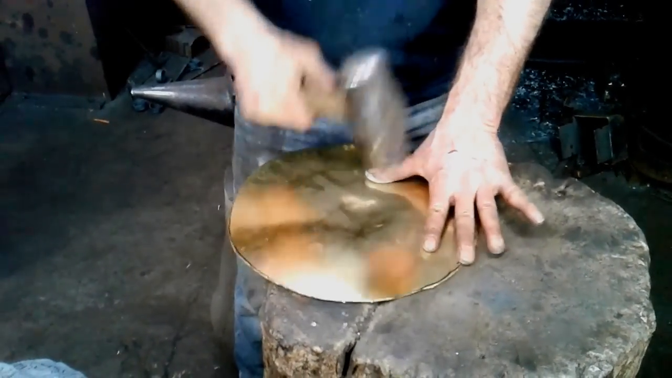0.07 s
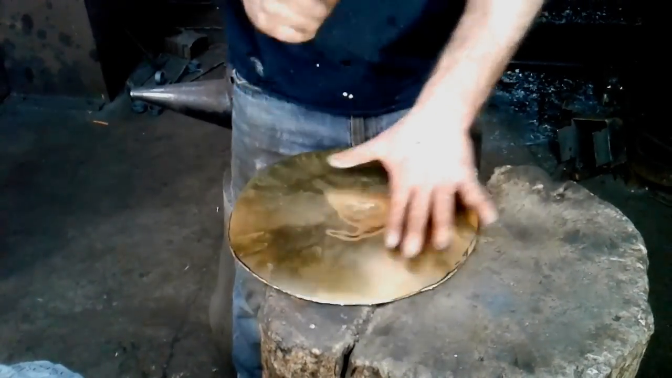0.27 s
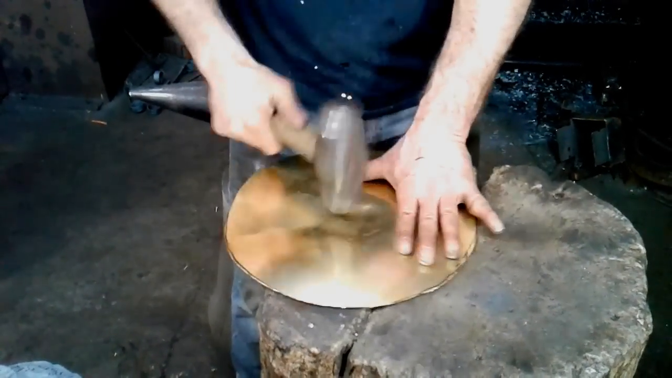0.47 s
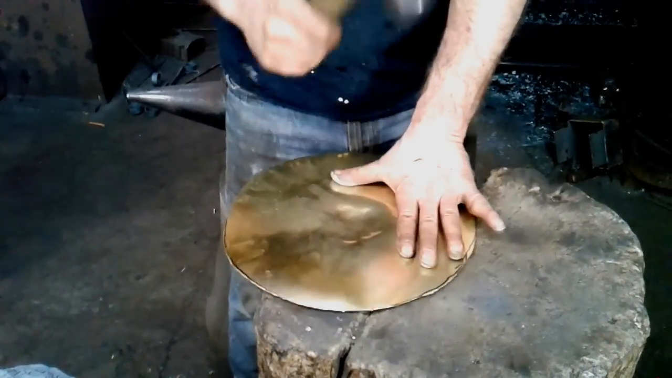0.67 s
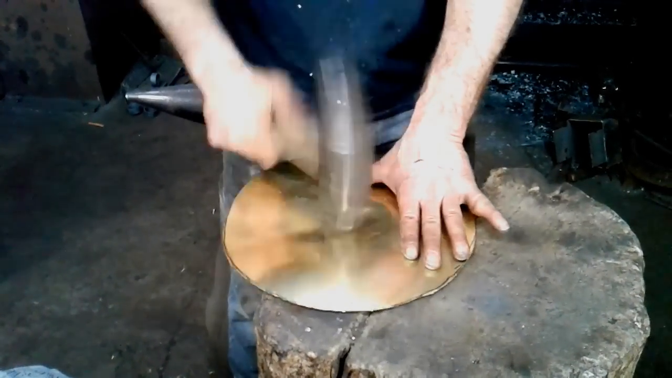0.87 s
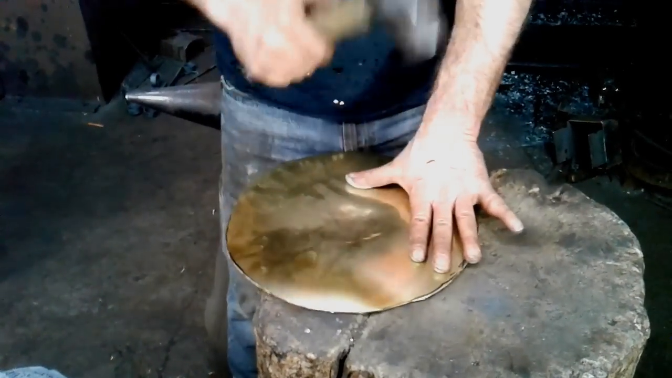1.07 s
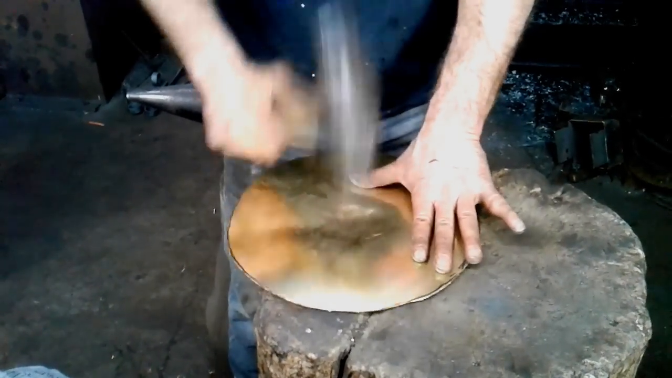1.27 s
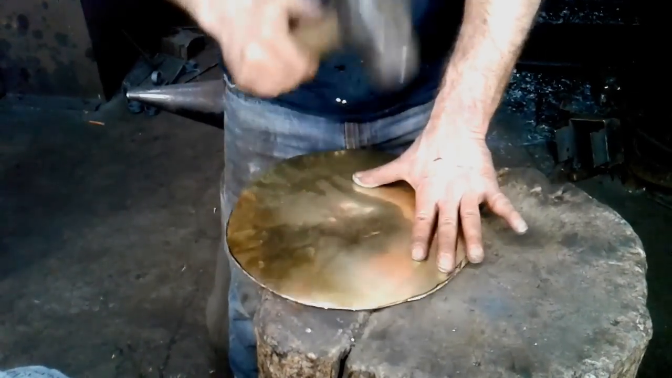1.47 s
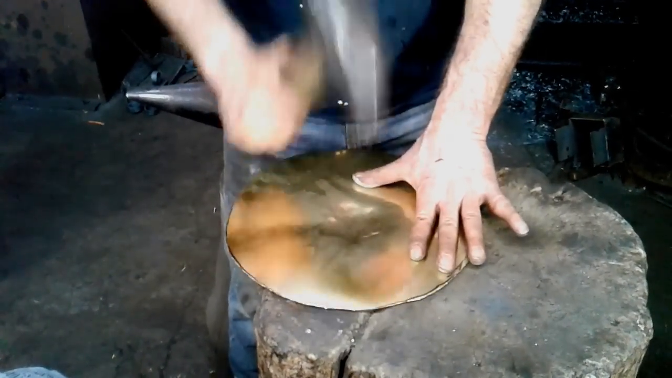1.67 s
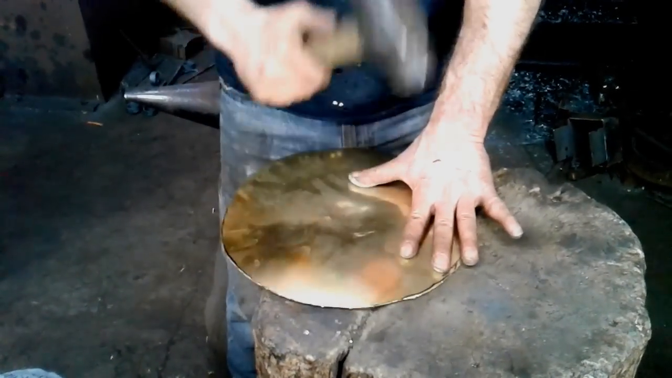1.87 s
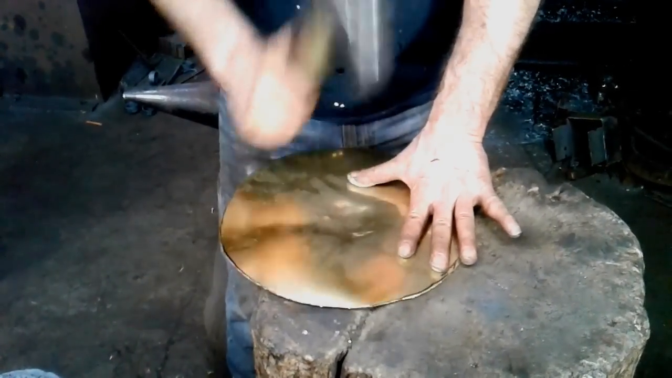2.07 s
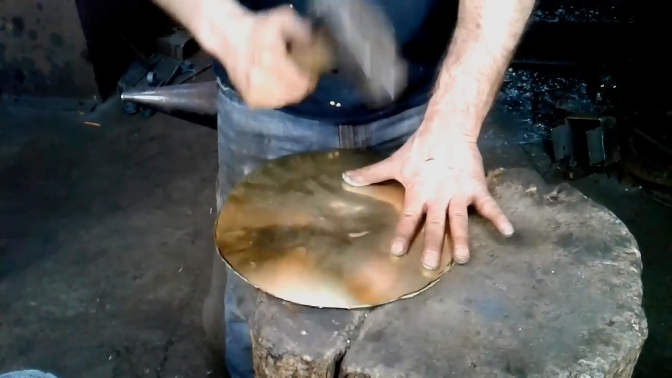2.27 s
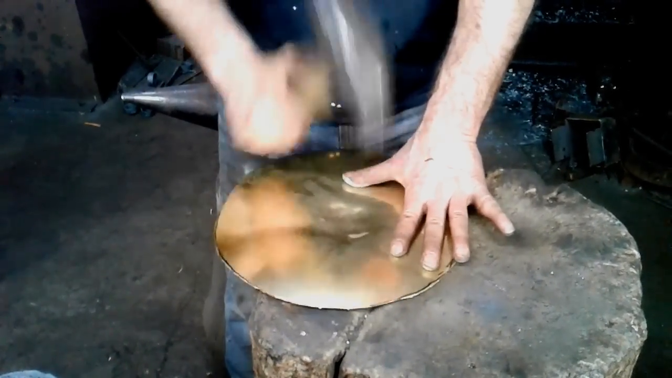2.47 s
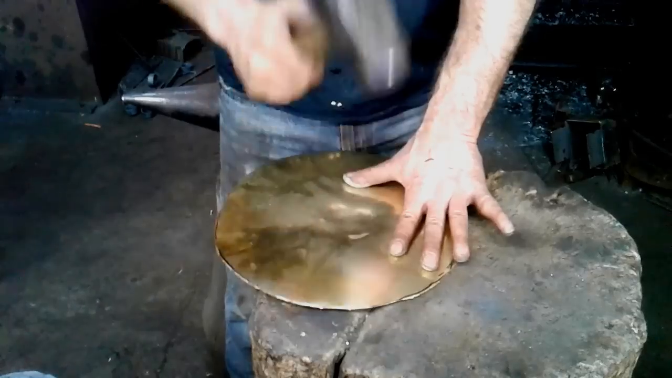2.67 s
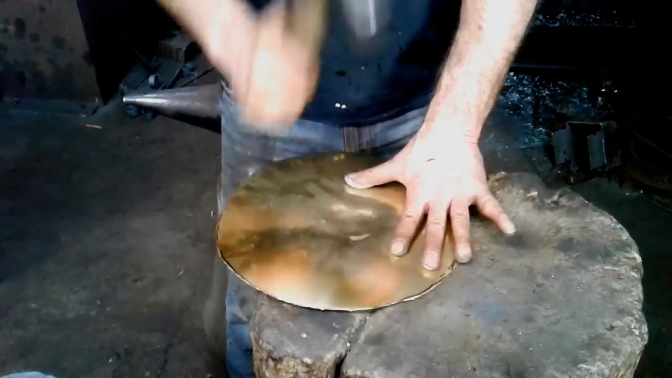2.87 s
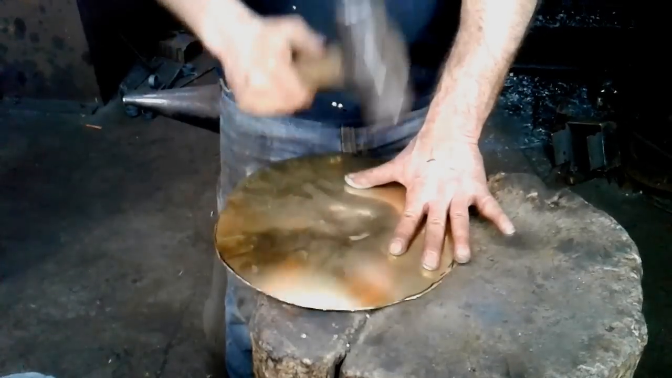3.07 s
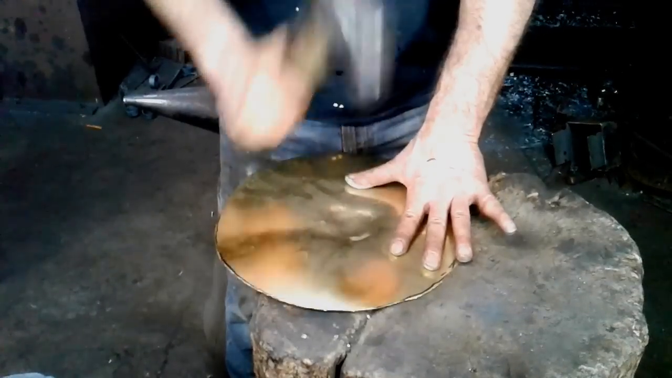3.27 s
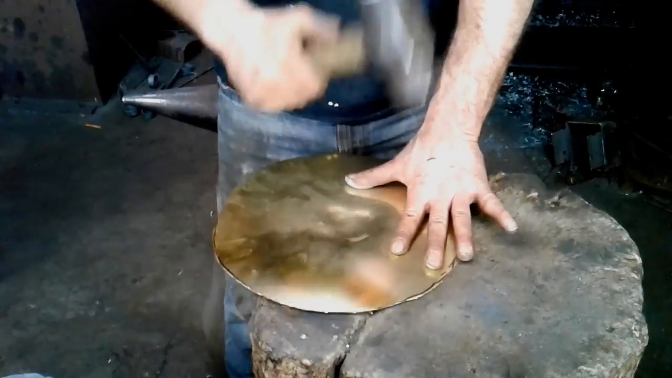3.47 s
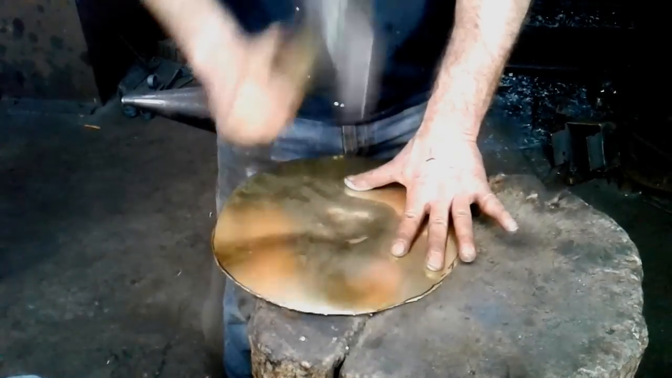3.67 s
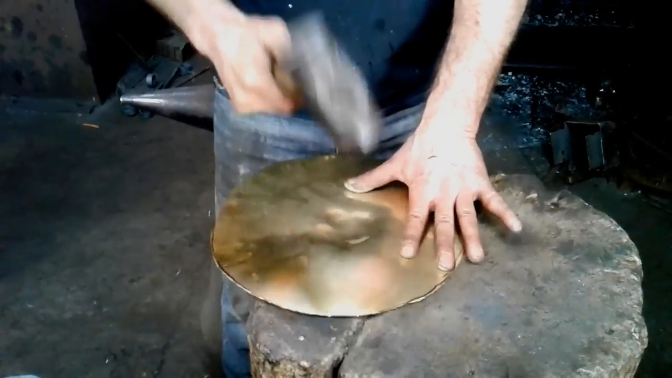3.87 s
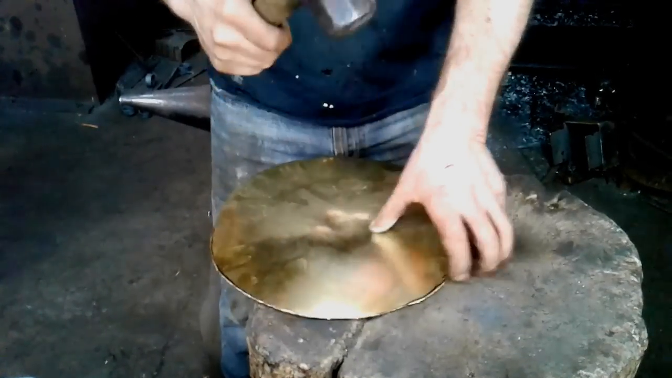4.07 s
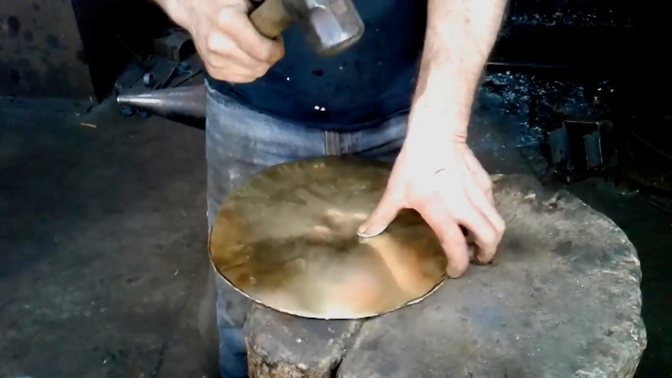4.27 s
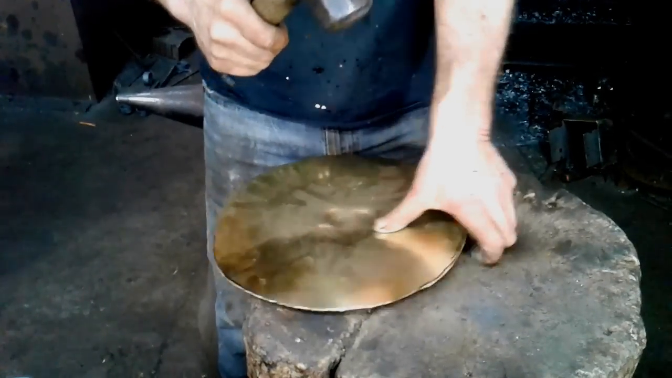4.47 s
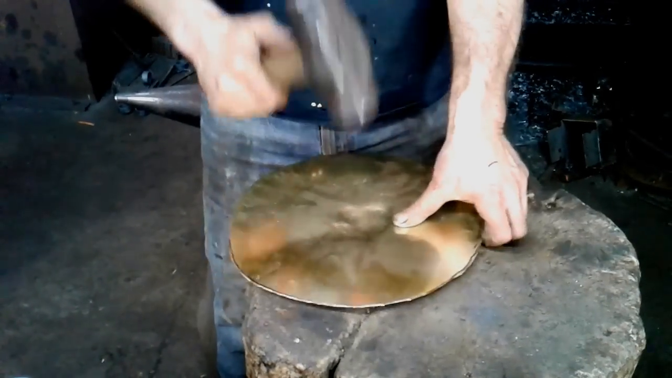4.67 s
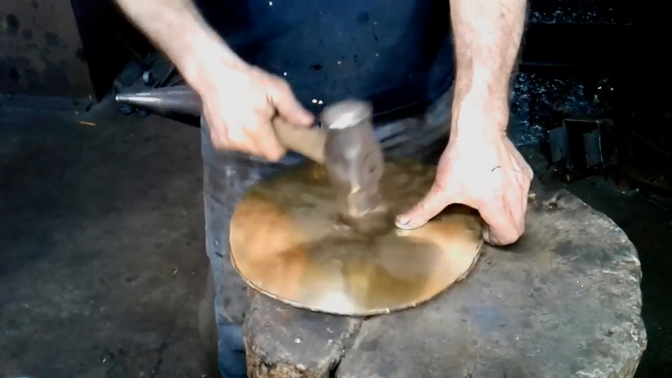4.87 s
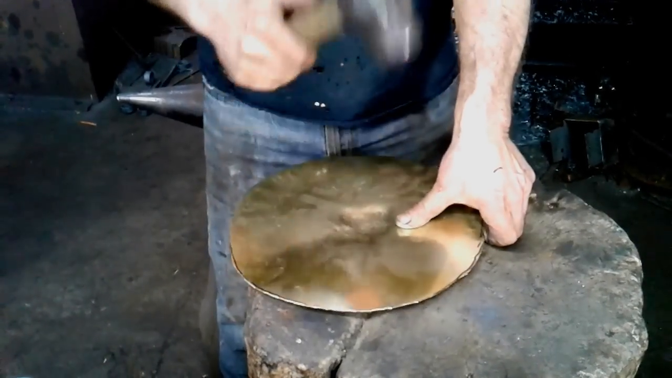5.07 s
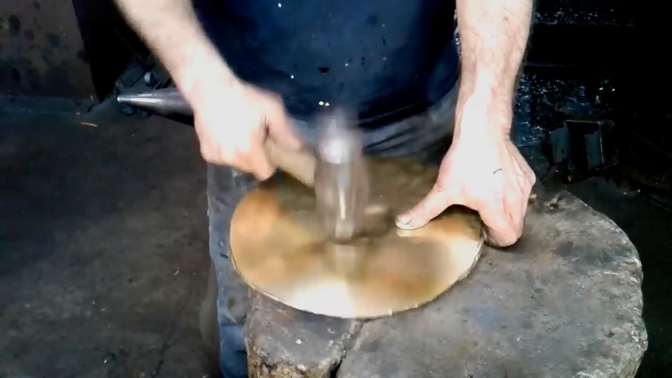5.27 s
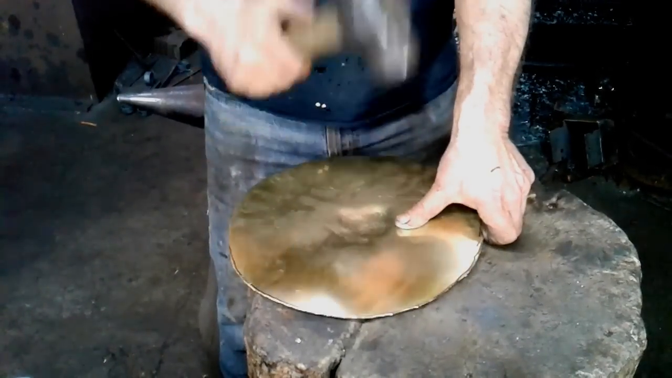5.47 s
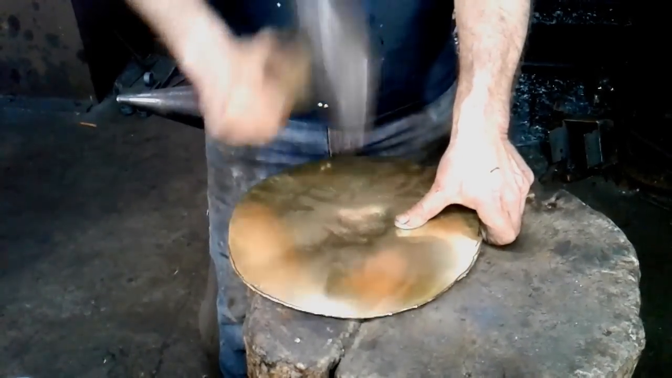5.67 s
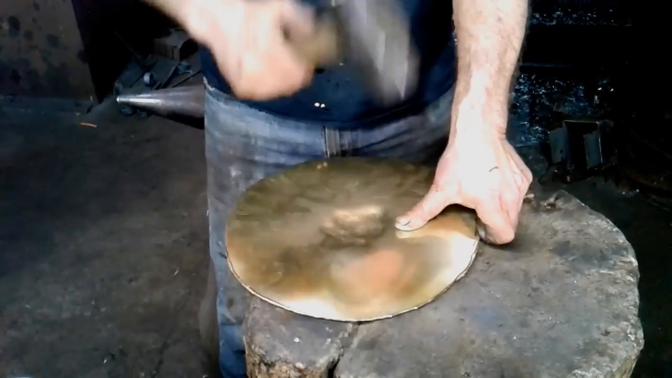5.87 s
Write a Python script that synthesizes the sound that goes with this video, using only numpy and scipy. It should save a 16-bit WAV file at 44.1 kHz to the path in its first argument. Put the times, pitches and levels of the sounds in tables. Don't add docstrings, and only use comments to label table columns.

```python
import sys
import numpy as np
from scipy import signal
from scipy.fft import rfft, irfft, next_fast_len
from scipy.io import wavfile

SR = 44100
rng = np.random.default_rng(int(sys.argv[2]) if len(sys.argv) > 2 else 0)


def wav_record(signal):
    frames = np.transpose(np.atleast_2d(signal))
    bounded = np.clip(frames, -1, 1)
    quanta = np.round(bounded * 32767).astype(np.int16)
    wavfile.write(sys.argv[1], SR, quanta)


def invert_db(x):
    u = np.asarray(x, float) / 20
    return 10 ** u


N = 260631
RUN_IN = SR // 2
LONG = N + RUN_IN

# [f/Hz, density/dB per Hz]
AIR_SPECTRUM = [(20, 1.5), (45, 0.5), (85, 0), (150, -3.5), (260, -2.5), (420, -8), (600, -11), (1000, -13),
                (2500, -20.5), (4600, -25), (6500, -16), (8000, -26.5), (9500, -30), (11500, -71),
                (16000, -68)]
# [f/Hz, level/dB, width/Hz]
MOTOR_LINES = [(119.3, 0, 22), (240, -15, 8), (290, -20, 15)]
# [t/s, level/dB, low clang/dB, bias kick 0-4]
BLOWS = [(0.1441, 3, -1.5, 2.1), (0.597, -5, 4, 0.51), (1.0149, -2.5, -1.5, 0.25), (1.424, 0.9, 1, 1.45),
         (1.844, 2, -7, 1.3), (2.253, 1.14, -3, 2.02), (2.6276, -2, -9, 0.17), (3.056, 4.5, -8, 2.5),
         (3.47, 2.16, 2, 1.63), (3.8645, -1.5, 14.5, 1.82), (4.9207, -11, 12, 0.37), (5.3909, 2.95, -32, 1),
         (5.8324, 3.5, -33, 0.49)]
EARLIER_BLOW = (-0.23, 0.7, 0.93, 1.1)
# [t/s of the blow, f/Hz, gain/dB]
FREE_MODES = [(0.144, 833, -6.5), (0.597, 589, 12), (0.597, 686, 9), (0.597, 963, 17), (0.597, 988, 4),
              (0.597, 900, -3), (1.015, 624, -3.5), (1.015, 976, 3), (1.015, 3100, 4), (1.424, 1630, -14),
              (2.628, 1590, -1), (3.470, 1500, -7), (5.391, 1263, 8.5), (4.921, 930, 2), (5.391, 5570, 5)]
# [f/Hz, density/dB per Hz]
DISC_SPECTRUM = [(60, 2), (130, -7.5), (200, -3), (320, -2), (450, -6), (700, -3.5), (1000, -5), (2000, -5),
                 (4000, -3), (6600, 0.5), (8500, -9.5), (11000, -27.5), (16000, -36)]
# [f/Hz, gain/dB]
LOW_MODE_GAIN = [(700, -14.5), (1600, -0.65)]
# [f/Hz, T60/s]
ROOM_T60 = [(100, 0.21), (260, 0.58), (700, 0.74), (1840, 0.64), (4850, 0.37), (8000, 0.32), (11000, 0.33),
            (15000, 0.14)]
# [t/s, peak level/dB, f/Hz]
TICKS = [(4.1274, -40, 7000), (4.1623, -32, 7500), (4.1694, -43, 7500), (4.1894, -32, 6600),
         (4.2024, -33, 6800), (4.2104, -34, 7300), (4.354, -27, 6800), (4.3954, -46, 7000),
         (4.4004, -34, 7000), (4.4176, -29, 6900), (4.605, -33, 4200), (4.611, -33, 5200),
         (4.619, -42, 4600)]
# [t/s, level/dB]
SLAPS = [
    (4.9203, 8),
    (4.9485, -4),
    (4.9842, 5.5),
    (5.1836, -31),
]


def rms_one(x):
    return x / np.sqrt(np.mean(x ** 2) + 1e-20)


def at_hz(points, hz):
    table = np.array(points)
    return np.interp(np.log(hz), np.log(table[:, 0]), table[:, 1])


def colour(x, level_db):
    hz = np.maximum(np.arange(len(x) // 2 + 1) * SR / len(x), 10)
    return irfft(rfft(x) * invert_db(level_db(hz)), len(x))


def resonance(x, hz, width_hz):
    r = np.exp(-np.pi * width_hz / SR)
    gain = (1 - r * r) / 2
    return signal.lfilter([gain, 0, -gain], [1, -2 * r * np.cos(2 * np.pi * hz / SR), r * r], x)


def add(track, s, x):
    i = RUN_IN + round(s * SR)
    track[i:i + len(x)] += x[:len(track) - i]


def background():
    air_db, hum_db = -44.5, -41.5
    waver_depth, waver_rad = 0.22, 0.3
    white = rng.standard_normal(2 * next_fast_len(LONG // 2 + 1))
    air = colour(white, lambda hz: at_hz(AIR_SPECTRUM, hz))[:LONG]
    out = invert_db(air_db) * rms_one(air)
    t = np.arange(LONG) / SR
    for hz, level_db, width_hz in MOTOR_LINES:
        r = np.exp(-np.pi * width_hz / SR)
        waver = rms_one(signal.lfilter([1], [1, -2 * r, r * r], rng.standard_normal(LONG)))
        line = np.sin(2 * np.pi * hz * t + waver_rad * waver)
        out += invert_db(level_db + hum_db) * (1 + waver_depth * waver) * line
    return out


def dispersed_click(spread_s, count=SR // 6):
    hz = np.arange(count // 2 + 1) * SR / count
    knots = np.arange(0, SR / 2 + 150, 150)
    scatter = np.minimum(rng.exponential(size=len(knots)), 3) ** 1.5
    delay = np.interp(hz, knots, spread_s * scatter + 0.0003816)
    phase = 2 * np.pi * np.cumsum(delay) * SR / count
    click = irfft(np.exp(-1j * phase), count)
    click[count // 2:] = 0
    return click


def struck(hz, level, t60, phase, count):
    t = np.arange(count)[:, None] / SR
    decay = np.exp(-np.log(1000) * t / t60)
    return (decay * np.sin(2 * np.pi * (hz * t + phase))) @ level


def blow(level_db, stump_db, clang_db, bright_db, spread_s=0.006):
    drive_db, modes_db, ring_s = 33.5, -46, 0.068

    def spectrum(hz):
        landing = [(280, stump_db), (800, 0.15 * clang_db), (2000, 0.0042), (5500, bright_db)]
        return at_hz(DISC_SPECTRUM, hz) + at_hz(landing, hz)

    crash = colour(dispersed_click(spread_s), spectrum)
    crash[len(crash) // 2:] = 0
    place, size, life, phase = rng.random(size=(4, 60))
    hz = 300 + (np.arange(len(place)) + place) * 130
    t60 = ring_s * (hz / 2000) ** -0.15 * (0.85 + 0.34 * life)
    mode_db = spectrum(hz) + at_hz(LOW_MODE_GAIN, hz) - 11.5 * size
    modes = struck(hz, invert_db(mode_db), t60, phase, len(crash))
    return invert_db(level_db + drive_db) * (crash + invert_db(modes_db) * modes)


def hammering():
    out = np.zeros((3, LONG))
    for k, (s, level_db, clang_db, _) in enumerate([EARLIER_BLOW, *BLOWS]):
        stump_db = min(0.74 - 1.03 * level_db + 0.058 * clang_db, 0)
        x = blow(level_db, stump_db, clang_db, 0.14 * clang_db)
        total = x.copy()
        for at, hz, gain_db in FREE_MODES:
            if abs(at - s) < 0.1:
                width_hz = 109 * invert_db(-0.9 * gain_db)
                total += invert_db(gain_db) * resonance(x, hz, width_hz)
        add(out[k % 3], s, total)
    return out


def workshop(x):
    build_up_s = 0.0026
    t = np.arange(SR) / SR
    edges = 50 * 2 ** np.arange(0, 8.5, 1 / 6)
    white = rng.standard_normal((2, len(t)))
    echo = np.zeros(len(t))
    for k, (low, high) in enumerate(zip(edges, edges[1:])):
        band_pass = signal.butter(2, [low, high], "band", fs=SR, output="sos")
        band = signal.sosfilt(band_pass, white[k % 2])
        echo += band * invert_db(-60 * t / at_hz(ROOM_T60, np.sqrt(low * high)))
    echo *= 1 - np.exp(-t / build_up_s)
    return signal.fftconvolve(x, echo / np.linalg.norm(echo))[:len(x)]


def ticks():
    fade_s, width_hz = 0.0013, 2200
    out = np.zeros(LONG)
    t = np.arange(SR // 50) / SR
    low_pass = signal.butter(3, 9000, fs=SR, output="sos")
    for s, level_db, hz in TICKS:
        grain = rng.standard_normal(len(t)) * np.exp(-t / fade_s)
        bright = resonance(resonance(grain, hz, width_hz), hz, width_hz)
        low_hz = 0.55 * hz
        dull = resonance(resonance(grain, low_hz, width_hz), low_hz, width_hz)
        tick = signal.sosfilt(low_pass, bright + invert_db(-5) * dull)
        add(out, s, invert_db(level_db) * tick / np.abs(tick).max())
    return out


def slaps():
    out = np.zeros(LONG)
    for s, level_db in SLAPS:
        add(out, s, blow(level_db - 18.5, stump_db=-23, clang_db=-6, bright_db=2.1, spread_s=0.0011))
    return out


def scene():
    room_db = 1
    loud = hammering()
    small = ticks() + slaps()
    echoes = workshop(loud[0] + 0.41 * small) + workshop(loud[1]) + workshop(loud[2])
    mix = background() + loud.sum(axis=0) + small + invert_db(room_db) * echoes
    return mix[None, RUN_IN:]


def bias():
    rise_s, recovery_s = 0.0029, 0.02
    swing_depth, swing_s, swing_fade_s = 0.31, 0.051, 0.04
    out = np.zeros(LONG)
    t = np.arange(SR // 3) / SR
    shove = (1 - np.exp(-t / rise_s)) ** 2 * np.exp(-t / recovery_s)
    swing = swing_depth * (1 - np.exp(-(t / swing_s) ** 3)) * np.exp(-t / swing_fade_s)
    for s, *_, kick in BLOWS:
        add(out, s, np.clip(kick, 0, 6) ** 1.52 * 1.11 * (shove - 3.2 * swing))
    return out[RUN_IN:]


def roll_off(x):
    return signal.sosfilt(signal.butter(12, 16870, fs=SR, output="sos"), x)


def record(dry):
    clip_top, input_top = 0.51, 0.89
    coupling_hz, shelf_hz, cutoff_hz = 95, 7660, 15980
    drive = (dry - bias()) / clip_top
    x = clip_top * drive / (1 + np.abs(drive) ** 4.2) ** (1 / 6.28)
    x = signal.sosfilt(signal.butter(3, coupling_hz, "high", fs=SR, output="sos"), x)
    x = x / (1 + np.abs(x / input_top) ** 7.5) ** (1 / 5.7)
    dull = signal.sosfilt(signal.butter(1, shelf_hz, "low", fs=SR, output="sos"), x)
    x = dull + 0.043 * (x - dull)
    x = signal.sosfilt(signal.cheby2(12, 35, cutoff_hz, fs=SR, output="sos"), x)
    return roll_off(x)


dry = scene()
out = record(dry)
wav_record(out)
```